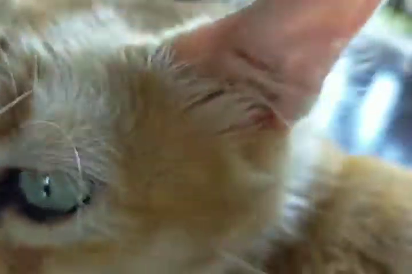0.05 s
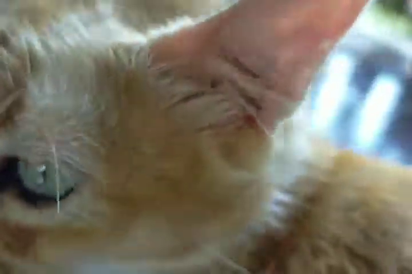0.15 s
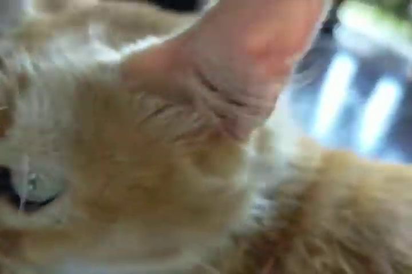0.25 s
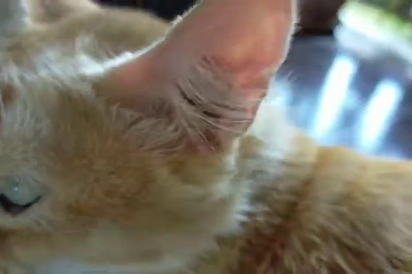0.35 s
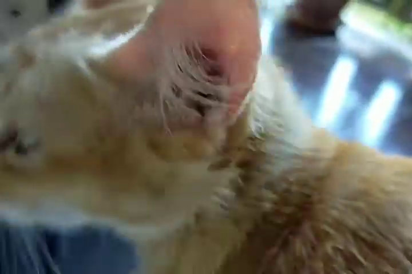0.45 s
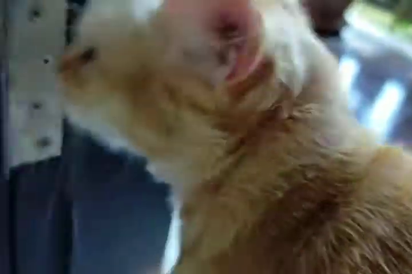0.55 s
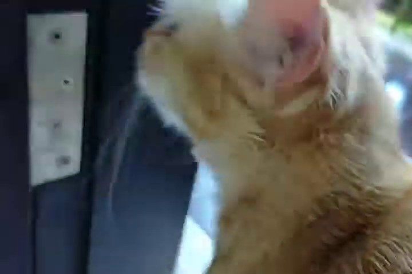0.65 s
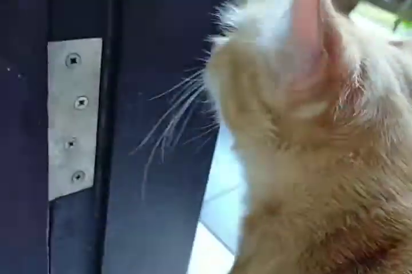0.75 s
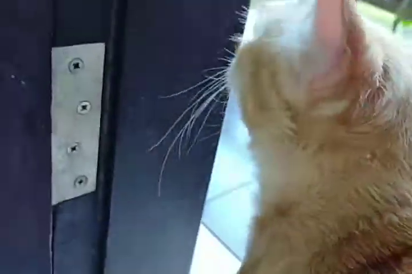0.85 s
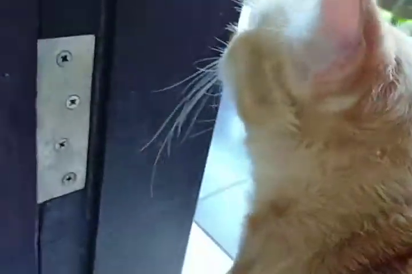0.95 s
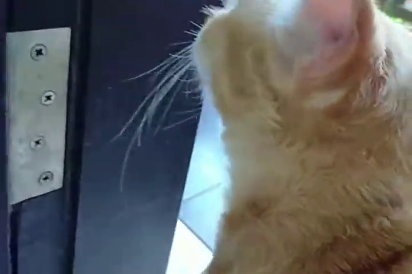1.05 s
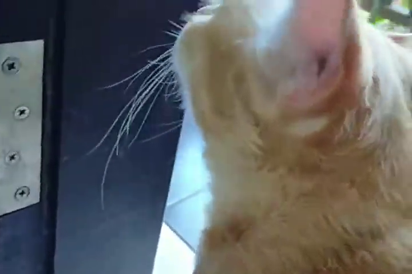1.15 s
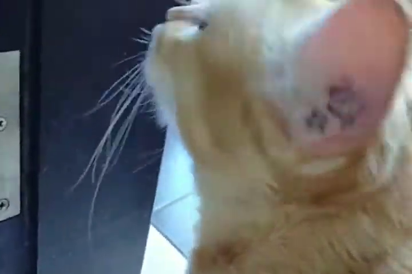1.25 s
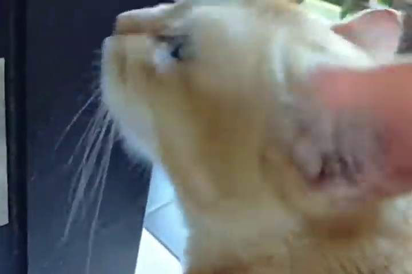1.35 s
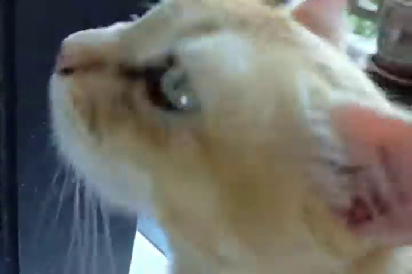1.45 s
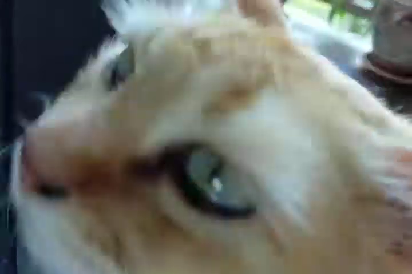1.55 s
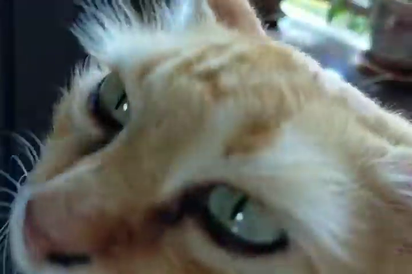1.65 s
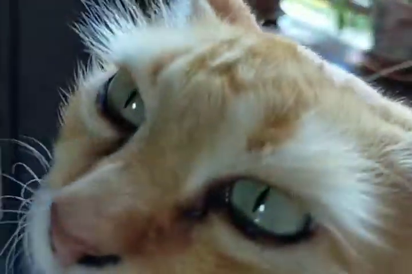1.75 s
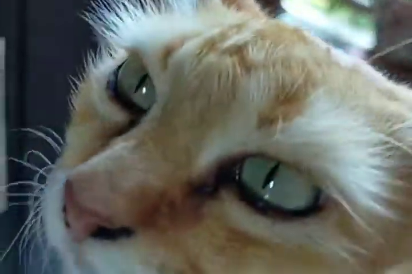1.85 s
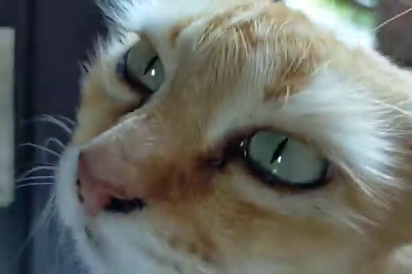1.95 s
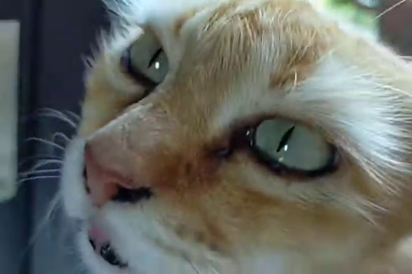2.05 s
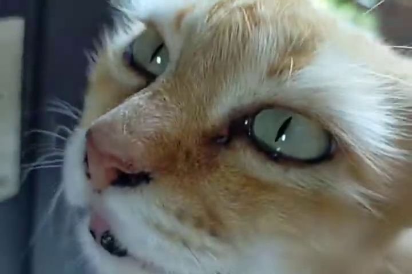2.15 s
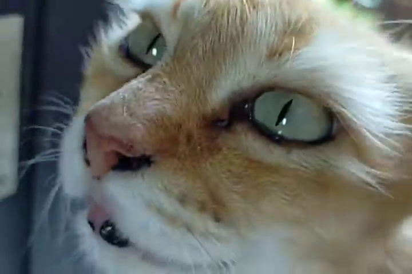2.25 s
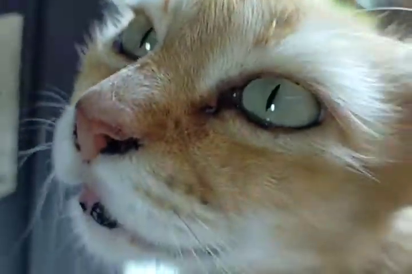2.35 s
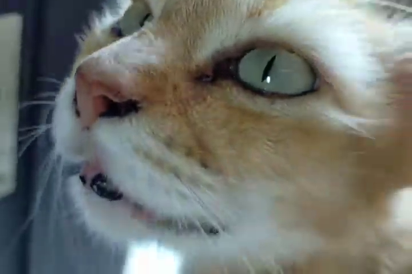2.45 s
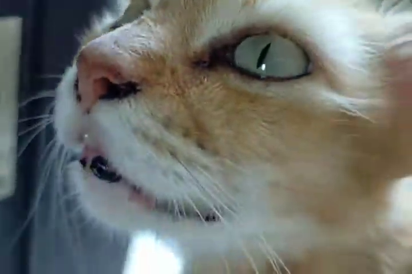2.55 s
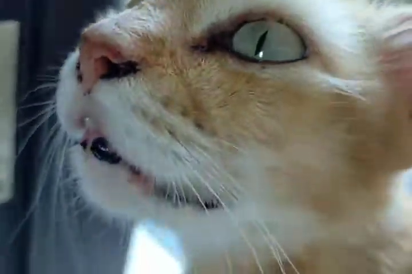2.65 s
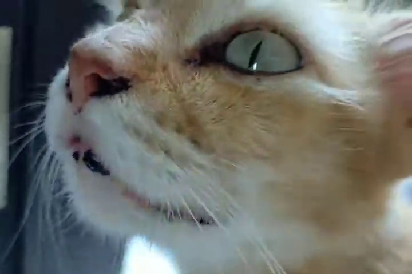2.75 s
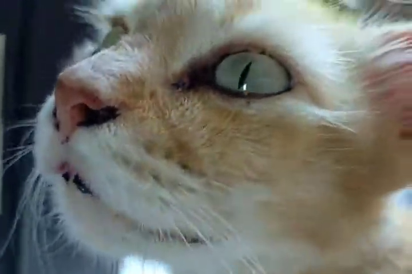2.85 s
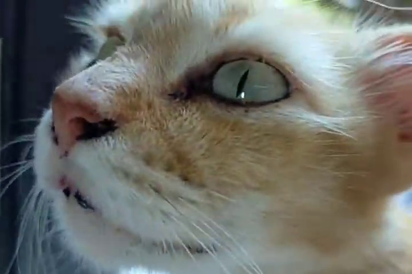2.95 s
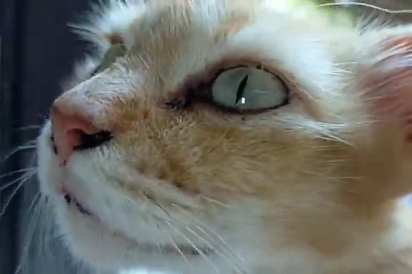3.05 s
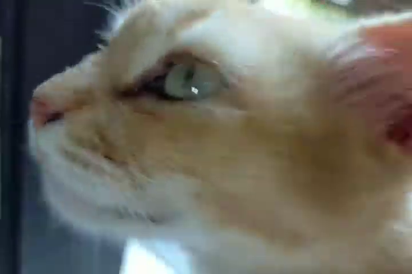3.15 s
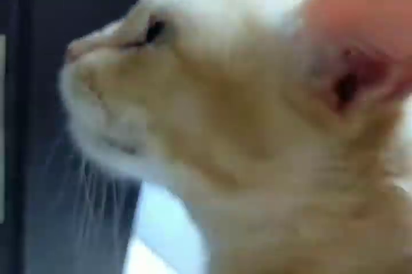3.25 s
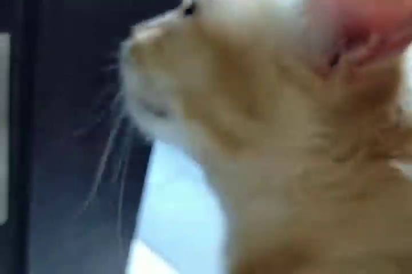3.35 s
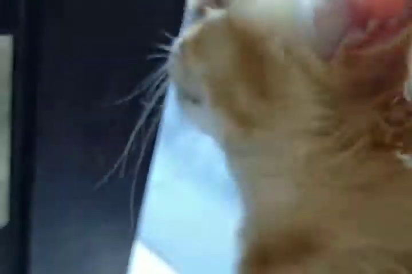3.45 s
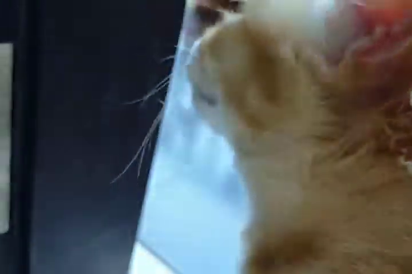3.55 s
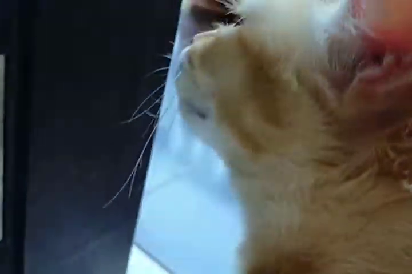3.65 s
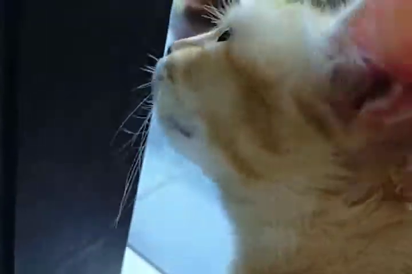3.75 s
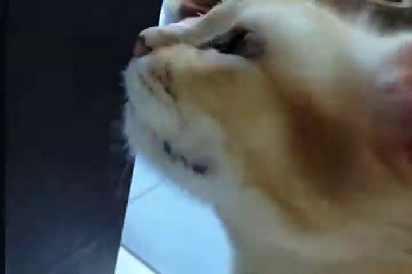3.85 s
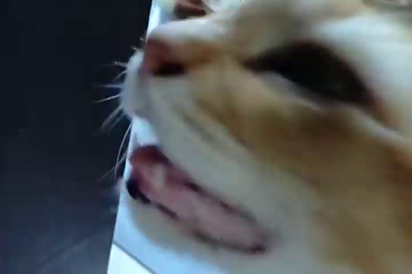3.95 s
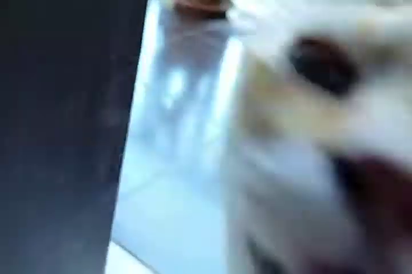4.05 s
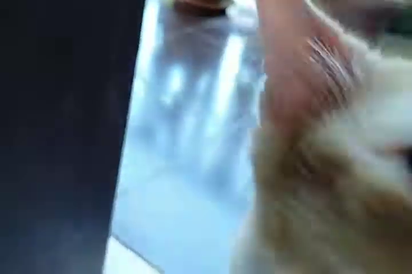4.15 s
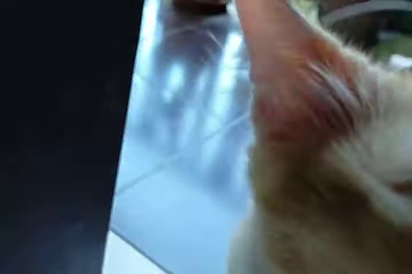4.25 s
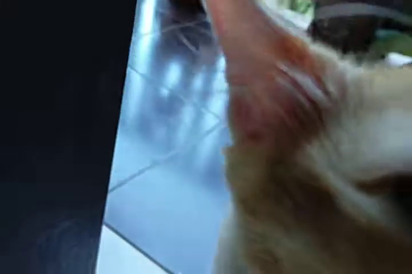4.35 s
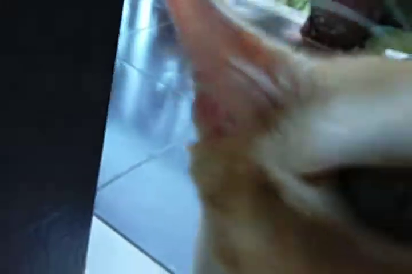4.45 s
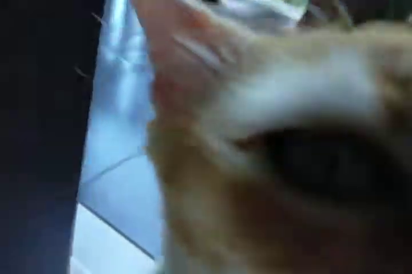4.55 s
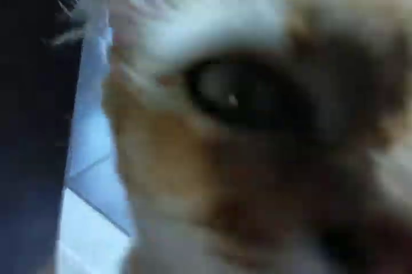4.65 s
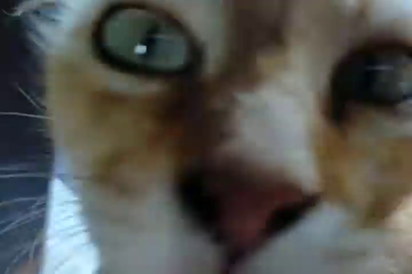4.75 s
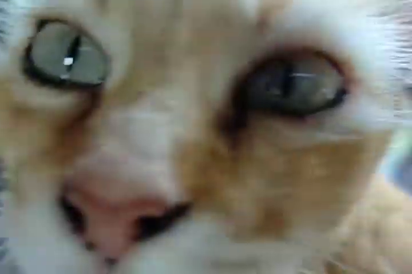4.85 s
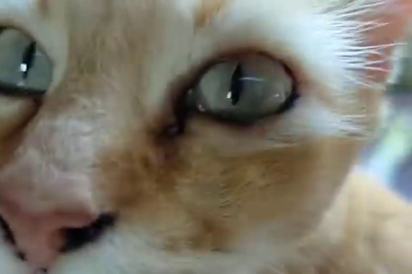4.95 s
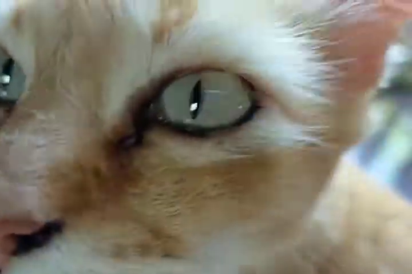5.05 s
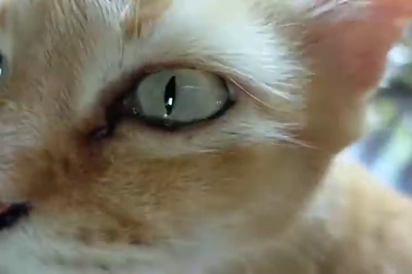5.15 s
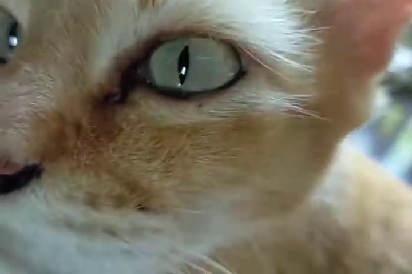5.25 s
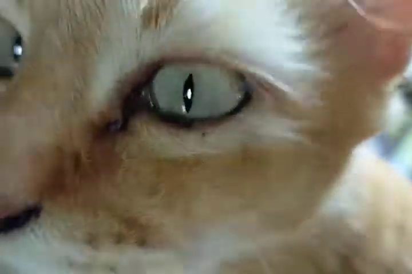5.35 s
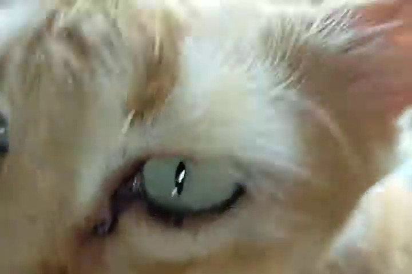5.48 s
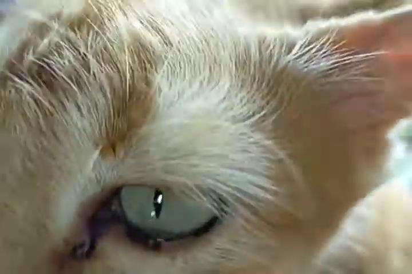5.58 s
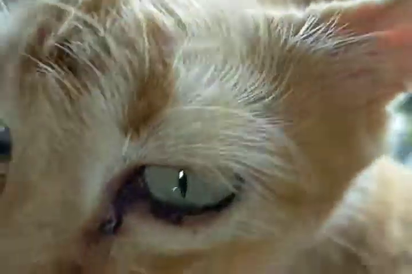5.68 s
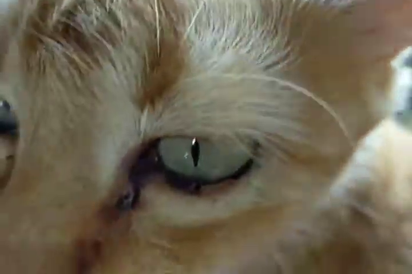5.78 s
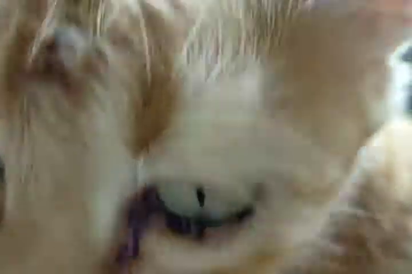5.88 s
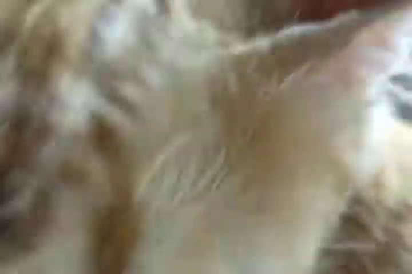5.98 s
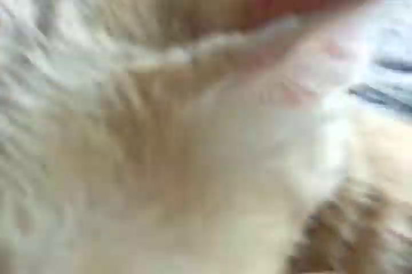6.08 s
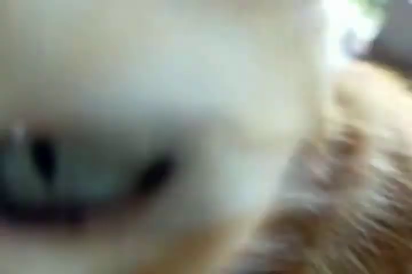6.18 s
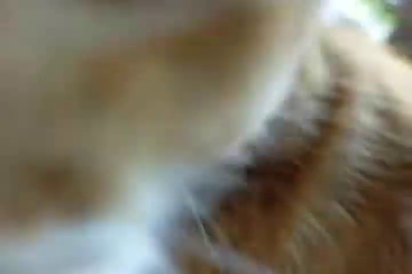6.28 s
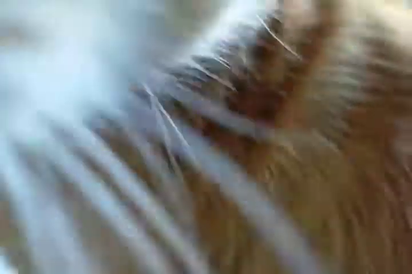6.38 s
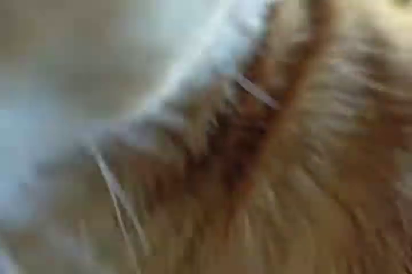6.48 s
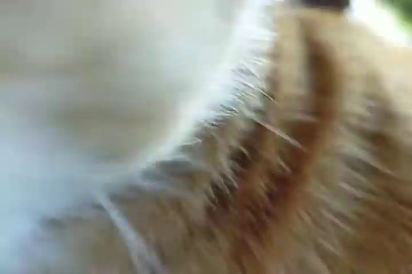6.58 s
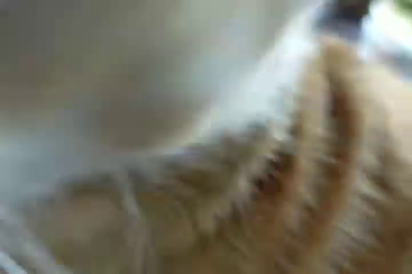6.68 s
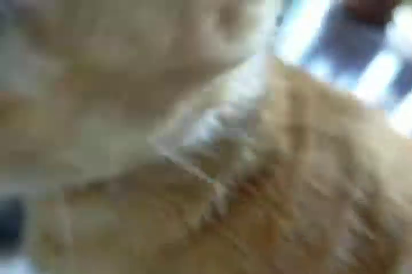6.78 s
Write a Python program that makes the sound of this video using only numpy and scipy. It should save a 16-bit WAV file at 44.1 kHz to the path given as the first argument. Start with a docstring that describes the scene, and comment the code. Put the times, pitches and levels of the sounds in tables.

```python
"""Outdoors, on a hand-held camera's single microphone: air, far insects, distant traffic that later swells.
From the start the hand rumbles, knocks and rustles on the body; low engine notes drift, a far metallic thing squeaks.
Then, right at the microphone, a cat's soft rising murmur opens into a short call; a longer, louder one follows.
Calls are partials shaped by a moving mouth, plus pulsing breath; air, rumble and rustle are coloured noise;
engines and squeak are unsteady tones, knocks are slow pushes."""
import sys
import numpy as np
from scipy import signal
from scipy.fft import rfft, irfft, next_fast_len
from scipy.io import wavfile
from scipy.ndimage import map_coordinates

SR = 44100
rng = np.random.default_rng(int(sys.argv[2]) if len(sys.argv) > 2 else 0)


def wav_out(sig):
    """Save sig, one row per channel (or a flat mono array), as 16-bit PCM at SR to the path in sys.argv[1]."""
    wavfile.write(sys.argv[1], SR, np.round(np.clip(np.atleast_2d(sig).T, -1, 1) * 32767).astype(np.int16))


N = 300569

# colour of the cat's breath, in the calls and in the puffs: (f/Hz, density/dB per Hz)
BREATH_TONE = [(700, -23.5), (1200, -4), (2100, 3.5), (3000, -7), (4700, -14.5), (6500, -22.5),
               (12000, -34)]


def amp(db):
    """Gain of a level in dB."""
    return 10 ** (np.asarray(db) / 20)


def unit(x):
    """x at rms 1."""
    return x / np.sqrt(np.mean(x ** 2) + 1e-20)


def along(points, hz):
    """(f/Hz, value) points read on a log frequency axis."""
    f, v = np.transpose(points)
    return np.interp(np.log(hz + 1), np.log(f + 1), v)


def curves(rows, t):
    """Each column after the time, read at times t."""
    s, *cols = np.transpose(rows)
    return [np.interp(t, s, c) for c in cols]


def wobble(rate, size=N):
    """A smooth random curve, rate knots a second (400 at most)."""
    knots = rng.standard_normal(int(size / SR * 400) + 4)
    return map_coordinates(knots, [np.arange(size) * min(rate, 400) / SR])


def hump(t, s, half):
    """A smooth rise and fall centred on s."""
    return np.cos(np.pi / 2 * np.clip((t - s) / half, -1, 1)) ** 2


def filtered(x, response):
    """x times a response of frequency."""
    m = next_fast_len(len(x) + 8192)
    return irfft(rfft(x, m) * response(np.fft.rfftfreq(m, 1 / SR)), m)[:len(x)]


def noise(spectrum, size=N):
    """Noise of rms 1 coloured by the spectrum, falling to -120 dB an octave beyond either end."""
    closed = [(spectrum[0][0] * .5, -120), *spectrum, (spectrum[-1][0] * 2, -120)]
    return unit(filtered(rng.standard_normal(size), lambda hz: amp(along(closed, hz))))


def bursts(rows, tone, bed_db=-120):
    """Coloured noise that swells and fades at each (t/s, half length/s, level/dB), over a steady bed."""
    t = np.arange(N) / SR
    swells = sum(amp(db) * hump(t, s, half) for s, half, db in rows)
    return (amp(bed_db) + swells) * noise(tone)


def add(out, s, x):
    """Mix x into out from time s."""
    part = out[max(round(s * SR), 0):][:len(x)]
    part += x[:len(part)]


def note(start, end, start_hz, end_hz, waver, flutter_db, rate):
    """Phase and swell of a slightly unsteady tone."""
    u = np.linspace(0, 1, round((end - start) * SR))
    hz = (start_hz + (end_hz - start_hz) * u) * (1 + waver * wobble(rate, size=len(u)))
    swell = np.sin(np.pi * u) ** .5 * amp(flutter_db * wobble(rate, size=len(u)))
    return 2 * np.pi * np.cumsum(hz) / SR, np.sqrt(2) * swell


def outdoors():
    """Steady air, far insects and swelling traffic as coloured noise, engine notes as drifting sines."""
    # the air around the microphone: (f/Hz, density/dB per Hz)
    air_tone = [(35, -40), (60, -5), (139, -6), (188, 0.5), (243, -4.5), (292, -9), (329, -9.5), (455, -10),
                (588, -8.5), (646, -9.5), (874, -10), (1180, -9), (2120, -11.5), (3450, -24.5),
                (15700, -32)]
    # far steady shrilling: (f/Hz, density/dB per Hz)
    insect_tone = [(6800, -9.5), (7600, -5.5), (8300, -1.5), (9000, -6.5), (9800, -22.5)]
    # colour of the distant traffic: (f/Hz, density/dB per Hz)
    road_tone = [(88, -38), (150, -6.5), (187, 0), (282, -9), (485, -14), (522, -7.5), (570, -12),
                 (670, -8), (1260, -3), (2140, -11.5), (5000, -36.5), (6500, -64), (11000, -120)]
    # the traffic's swell: (t/s, level/dB)
    traffic = [(0, -78), (1.86, -80), (2.1, -61), (2.73, -62), (3.57, -57.5), (4.2, -51.5), (6.11, -51.5),
               (6.47, -49), (6.82, -51.5)]
    # faint drifting engine notes: (start t/s, end t/s, start f/Hz, end f/Hz, level/dB)
    drones = [(.6, 0.998, 221.7, 217, -59.5), (.75, 1.104, 272.3, 304, -64.5),
              (.78, 1.714, 560, 600, -67.5), (1.4, 1.656, 299, 310, -61.5), (2.07, 2.31, 218, 218.6, -54),
              (4.1, 4.489, 193.7, 181.8, -58), (4.62, 4.88, 188, 180.3, -53.5),
              (4.95, 5.25, 181.1, 181.3, -59), (5.4, 5.895, 186.5, 173.1, -56.5),
              (6.36, 6.48, 520, 529, -61)]
    air_db, insects_db = -55.5, -73

    road_db = curves(traffic, np.arange(N) / SR)[0]
    out = amp(air_db) * noise(air_tone)
    out += amp(road_db + 0.61 * wobble(11.0)) * noise(road_tone)
    out += amp(insects_db + 1.2 * wobble(1.8)) * noise(insect_tone)
    for start, end, start_hz, end_hz, db in drones:
        phase, swell = note(start, end, start_hz, end_hz, waver=.014, flutter_db=3.5, rate=22)
        add(out, start, amp(db) * swell * np.sin(phase))
    return out


def hand():
    """Soft pushes on the body over a lumpy two-band rumble, and a fine rustle of fur and fingers over hiss."""
    # how hard the hand works the body: (t/s, low rumble level/dB)
    grip = [(0, -51.5), (.45, -46), (.83, -59.5), (1.18, -39), (1.5, -61), (2.4, -60.5), (3.1, -68),
            (3.7, -59.5), (4.35, -46), (4.48, -53), (4.7, -49.5), (5.1, -57.5), (5.54, -53), (5.66, -48),
            (5.85, -53.5), (6.23, -49), (6.41, -57), (6.6, -48.5), (6.82, -39)]
    # knocks on the body: (t/s, peak level/dB, push length/s, direction)
    bumps = [(.301, -37, 0.0031, 1), (.353, -32, .012, 1), (.361, -28.5, 0.0024, 1), (.387, -24, 0.006, 1),
             (.432, -36, 0.0036, 1), (.806, -36.5, 0.011, -1), (.887, -36.5, 0.0078, 1),
             (1.171, -32.5, 0.0034, 1), (1.18, -31.5, 0.0077, -1), (1.212, -29, 0.0047, 1),
             (1.363, -36.5, 0.0092, 1), (3.902, -33.5, 0.0076, 1), (5.645, -31, 0.0029, 1),
             (5.711, -41, 0.0051, 1), (5.757, -35, 0.0042, 1), (6.02, -38, 0.013, 1),
             (6.394, -37, 0.0085, 1), (6.682, -28, .003, 1), (6.689, -35, 0.0079, 1)]
    # fur and fingers: (t/s, half length/s, level/dB)
    rustles = [(.6, 0.58, -70), (.63, .04, -69), (.72, .04, -67), (.82, .07, -66), (1.35, .3, -67),
               (1.1, .05, -64), (1.31, 0.064, -63), (1.43, .04, -64.5), (1.53, .04, -61), (1.75, .04, -67),
               (1.99, .07, -70), (2.23, .05, -64), (2.5, .06, -75), (2.72, .06, -73), (2.96, .06, -68.5),
               (3.16, .04, -69), (3.29, .06, -73), (3.57, .07, -68), (3.83, .05, -68), (5.48, .06, -75),
               (6.05, .1, -81), (6.35, .08, -67), (6.5, .1, -65), (6.74, .07, -71)]
    # colour of the rustle and the hiss: (f/Hz, density/dB per Hz)
    rustle_tone = [(5000, -40.5), (7500, -19), (11000, -17), (13500, -9), (15700, -3.5)]
    upper_rumble_db, upper_follows = -57, .4  # level at a grip of -52 dB; share of the grip's swing
    hiss_bed_db = -74.5  # steady high hiss throughout

    t = np.arange(N) / SR
    out = np.zeros(N)
    for s, db, length, direction in bumps:
        u = np.arange(round(-2 * length * SR), round(6 * length * SR)) / SR / length
        # a quick push, then a slower and weaker swing back
        push = np.exp(-2.8 * u ** 2) - 0.84 * np.exp(-((u - 1.5) / 0.71) ** 2)
        add(out, s - 2 * length, np.sign(direction) * amp(db) * push)
    low_db, = curves(grip, t)
    upper_db = upper_rumble_db + upper_follows * (low_db + 52)
    out += amp(low_db + 3.6 * wobble(11)) * noise([(18, -2.0), (30, -4), (70, -12.5)])
    out += amp(upper_db + 3.4 * wobble(36)) * noise([(70, -2.0), (110, -4.0), (160, -17)])
    return out + amp(2.5 * wobble(45)) * bursts(rustles, rustle_tone, hiss_bed_db)


def squeak():
    """Far metal: a steady tone with overtones; a scratchy band just above it starts a little earlier."""
    # each squeak: (start t/s, end t/s, tone level/dB, overtone level re tone/dB, scratch level/dB);
    # the overtone level is reached two thirds of the way through
    squeaks = [(1.199, 1.386, -57, -18, -65), (1.342, 1.463, -68, -8, -69), (3.009, 3.257, -70, -18, -75),
               (5.395, 5.548, -62, -10, -58.5), (5.522, 5.64, -66, -20, -69)]
    # colour of the scratch: (f/Hz, density/dB per Hz)
    scratch_tone = [(3300, -18), (3520, 3), (3620, -12), (3780, 5), (3950, -35)]
    squeak_hz = 3073

    out = np.zeros(N)
    for start, end, db, overtone_db, scratch_db in squeaks:
        phase, swell = note(start, end, squeak_hz, squeak_hz, waver=.0015, flutter_db=2.5, rate=50)
        late = np.linspace(0, 1.5, len(phase))  # the overtones grow toward the end
        overtones = np.sin(2 * phase) + np.sin(4 * phase)
        tone = np.sin(phase) + amp(overtone_db) * late * overtones
        add(out, start, amp(db) * swell * np.hanning(len(phase)) ** .6 * tone)
        size = len(phase) + round(.04 * SR)
        scratch = np.hanning(size) ** .7 * noise(scratch_tone, size=size)
        add(out, start - .07, amp(scratch_db) * scratch)
    return out


def meow(rows, jitter, tremor, mouth_width_hz=500):
    """A clear stack of partials shaped by the moving mouth, with breath pulsing once a cycle."""
    # through both calls: (t/s, mouth ring level/dB, treble level/dB)
    mouth_rows = [(1.83, -88, -85), (2.155, -78, -78), (2.18, -53, -76), (2.21, -60, -74), (2.25, -47, -65),
                  (2.45, -52, -68), (2.496, -51, -58), (2.56, -57, -69), (2.612, -66, -63.5),
                  (2.7, -57, -73), (2.78, -79, -78), (3.9, -92, -86), (3.94, -60.5, -68),
                  (3.965, -42.5, -65), (4.0, -49, -56), (4.088, -50, -61), (4.128, -58, -55),
                  (4.2, -51.5, -48), (4.314, -51, -48.5), (4.434, -46, -54.5), (4.55, -51.5, -56.5),
                  (4.64, -48, -49), (4.76, -54, -49), (4.8, -50, -53), (4.91, -61, -56.5), (5.01, -72, -73),
                  (5.08, -57, -79), (5.112, -64, -74)]
    # partials five to ten, re treble level: (f/Hz, level/dB)
    treble_shape = [(3530, -23.5), (6000, -22.5), (7460, -4), (8150, -12), (9500, -18.5), (12400, -43),
                    (20900, -120)]
    # partials above the tenth, re treble level less 11 dB: (f/Hz, level/dB)
    top_shape = [(9000, -7), (10300, -6.5), (11200, -13.5), (12000, -14), (13000, -8), (14000, -19),
                 (15300, -10)]
    # the voice turns unsteady where it is weak: (t/s, half length/s, extra jitter as a multiple)
    rough = [(2.06, .13, 7), (2.81, .08, 5), (3.83, .09, 6), (5.06, .09, 1.6)]
    # the voice slips: (t/s, pitch drop as a share, level drop/dB)
    slips = [(2.827, 0.015, 29), (4.116, 0.019, 3), (4.207, 0.0088, -1), (4.38, 0.028, 3.5),
             (4.427, .014, 4), (4.68, 0.015, 4), (4.786, 0.035, 8.5), (4.821, 0.016, 0),
             (4.851, 0.035, 3.5), (5.059, 0.011, 10)]
    # every second cycle weaker, lines appear halfway between partials: (t/s, half length/s, level/dB)
    doubling = [(2.11, 0.05, -48), (3.976, .025, -44.5), (4.089, 0.02, -43), (4.126, 0.012, -40)]
    # the call quavers out: (onset t/s, first crest t/s, rate f/Hz, pitch depth as a share)
    quaver_settings = (2.696, 2.714, 31.2, .036)
    bright_db = -45  # partial 4 with the mouth wide open
    open_mouth_hz, mouth_hz_per_db = 5376, 34  # the ring when wide open, and its fall as the voice dulls
    # breath when wide open; share of the dulling it follows; rise per unit of extra jitter
    open_breath_db, breath_follows, hoarse_db = -57.5, .45, 1.6
    slip_s = .0075  # half length

    t = np.arange(round(rows[0][0] * SR), round(rows[-1][0] * SR)) / SR
    pitch, *low_db = curves(rows, t)
    mouth_db, treble_db = curves(mouth_rows, t)
    brightness_db = low_db[3] - bright_db  # negative as the voice dulls
    mouth_hz = open_mouth_hz + mouth_hz_per_db * np.clip(brightness_db, -22, 0)

    unsteady = sum(extra * hump(t, s, half) for s, half, extra in rough)
    flutter = wobble(110, size=len(t)) * (1 + unsteady)
    onset, crest, rate, depth = quaver_settings
    fade_in = np.clip((t - onset) * rate / 0.99, 0, 1)
    quaver = tremor * fade_in * np.cos(2 * np.pi * rate * (t - crest))
    drop = sum(share * hump(t, s, slip_s) for s, share, _ in slips)
    weaker_db = sum(db * hump(t, s, slip_s) for s, _, db in slips)
    pitch = pitch * (1 + jitter * flutter + depth * quaver - drop)
    phase = 2 * np.pi * np.cumsum(pitch) / SR

    voice = np.zeros(len(t))
    for k in range(1, 18):
        hz = k * pitch
        if k <= len(low_db):
            gain = amp(low_db[k - 1])
        else:
            mouth = amp(mouth_db) / (1 + (2 * (hz - mouth_hz) / mouth_width_hz) ** 2)
            open_hz = hz * open_mouth_hz / mouth_hz  # all upper resonances sink with the ring
            shape_db = along(treble_shape, open_hz) if k <= 10 else -11 + along(top_shape, open_hz)
            gain = mouth + amp(treble_db + shape_db)
        # the resonances over the fundamental turn pitch flutter and slips into throbs
        throb_db = .7 * flutter + .45 * wobble(75, size=len(t)) * min(k, 7) + 1.5 * quaver - weaker_db
        if k > 6:  # tongue and lips shift the high partials one by one
            throb_db += 2.5 * wobble(9, size=len(t))
        if k == 1:
            throb_db *= .4
        partial = np.sin(k * phase + rng.uniform(0, 2 * np.pi))
        voice += np.sqrt(2) * gain * amp(throb_db) * partial

    halves = sum(amp(db) * hump(t, s, half) for s, half, db in doubling)
    voice += halves * (np.sin(2.5 * phase) + .2 * np.sin(3.5 * phase))
    breath_db = open_breath_db + breath_follows * brightness_db + hoarse_db * unsteady
    breath = amp(breath_db) * noise(BREATH_TONE, size=len(t)) * (1 + .5 * np.cos(phase))
    return (voice + breath) * signal.windows.tukey(len(t), .015)


def cat():
    """Both calls, throat catches as short sines, puffs of air as crackly noise, rasps as smooth bright noise."""
    # each call: (t/s, pitch f/Hz, partial 1 level/dB, partial 2 level/dB, partial 3 level/dB, partial 4 level/dB)
    first_call = [(1.83, 400, -67, -70, -63, -84), (1.939, 498, -63, -62, -72, -84),
                  (2.0, 547.4, -60, -60, -66, -84), (2.039, 639, -56, -58, -59, -85),
                  (2.123, 678, -70, -43, -47.5, -73), (2.15, 806, -59, -46.5, -64, -80),
                  (2.18, 948, -38, -40, -49, -70), (2.21, 1041, -39.5, -44.5, -53, -60),
                  (2.245, 967, -36, -39.5, -43, -62), (2.275, 955.4, -36.5, -38, -53.5, -64),
                  (2.446, 983, -36.5, -42, -44.5, -62), (2.495, 922.5, -37, -35, -47, -58),
                  (2.552, 975, -37, -38.5, -52, -63), (2.612, 998, -39, -43.5, -49, -65),
                  (2.72, 963, -38, -41.5, -50, -66), (2.8, 930, -40.5, -48, -54, -68),
                  (2.85, 850, -48, -58, -55, -76)]
    # columns as in the first call
    second_call = [(3.76, 516, -62, -63, -75, -85), (3.86, 570, -61, -65, -68, -83),
                   (3.895, 880, -55, -68, -67, -83), (3.922, 906, -36, -57, -58, -80),
                   (3.944, 914, -34, -34.5, -47.5, -75), (3.975, 896.7, -34.5, -32, -38, -50.5),
                   (4.015, 925, -36.5, -29, -39, -45), (4.095, 918, -38.5, -25, -41.5, -42),
                   (4.128, 874, -34, -29, -37.5, -42), (4.191, 890, -32.5, -27.5, -35.5, -41),
                   (4.313, 904, -32, -20.5, -41, -45), (4.433, 915.5, -32.5, -17.5, -46, -49.5),
                   (4.529, 922, -32.5, -18.5, -46.5, -49), (4.66, 941, -31.5, -16, -43.5, -48.5),
                   (4.695, 932.6, -32, -21, -42, -46.5), (4.77, 927.6, -34, -24.5, -46, -43.5),
                   (4.805, 954, -33, -21, -49, -48.5), (4.908, 996.6, -34, -27, -44, -52.5),
                   (5.004, 978, -36, -37.5, -50.5, -57.5), (5.03, 962, -38.5, -42.5, -52, -65),
                   (5.08, 983, -36.5, -40.5, -52, -62), (5.097, 875, -40, -48, -50, -53),
                   (5.112, 1100, -38, -62, -72, -76)]
    # catches of the voice: (centre t/s, length/s, ringing f/Hz, peak level/dB)
    catches = [(2.057, 0.014, 1520, -51), (2.142, .03, 1246, -43), (2.739, 0.011, 1187, -43),
               (2.859, 0.021, 750, -45), (2.907, 0.026, 2250, -52), (3.16, .027, 2200, -53),
               (3.941, .012, 1885, -22.5), (4.253, 0.0088, 1895, -20), (5.109, 0.0083, 1184, -32),
               (5.122, .013, 1690, -43), (5.127, .008, 1050, -37), (5.147, 0.0091, 1513, -47),
               (5.16, .04, 3650, -54)]
    # breath let out: (t/s, half length/s, level/dB)
    puffs = [(2.15, 0.028, -57), (2.877, 0.16, -59), (3.173, 0.031, -55), (5.105, 0.015, -60),
             (5.135, 0.072, -48)]
    # bright air through the teeth: (t/s, level/dB)
    rasps = [(3.96, -59), (4.085, -53), (4.12, -59), (4.2, -55), (4.255, -63), (4.305, -59), (4.66, -57),
             (4.79, -58)]
    # colour of the rasps: (f/Hz, density/dB per Hz)
    rasp_tone = [(2000, -15), (4000, -6), (7500, -3), (10000, -8), (13000, -19.5), (15700, -10)]
    rasp_s = 0.019  # half length

    out = np.zeros(N)
    add(out, first_call[0][0], meow(first_call, jitter=.004, tremor=1))
    add(out, second_call[0][0], meow(second_call, jitter=.005, tremor=0))
    for s, length, hz, db in catches:
        t = np.arange(round(length * SR)) / SR
        add(out, s - length / 2, amp(db) * np.hanning(len(t)) * np.sin(2 * np.pi * hz * t))
    crackle = amp(2.5 * wobble(300))
    rasp_rows = [(s, rasp_s, db) for s, db in rasps]
    return out + crackle * bursts(puffs, BREATH_TONE) + bursts(rasp_rows, rasp_tone)


def porch(x):
    """A faint diffuse answer of tiles and walls: a noise tail falling 60 dB in 0.3 s."""
    t = np.arange(SR // 2) / SR
    tail = rng.standard_normal(len(t)) * amp(-60 * t / .3)
    return amp(-23) * signal.fftconvolve(x, tail / np.linalg.norm(tail))[:N]


def scene():
    """Everything at the single microphone; only the cat's voice is answered by the porch."""
    voice = cat()
    return (voice + porch(voice) + hand() + outdoors() + squeak())[None]


def record(dry):
    """The camera keeps nothing above its band limit."""
    top_hz = 15720
    return filtered(dry[0], lambda hz: hz < top_hz)[None]


dry = scene()
out = record(dry)
wav_out(out)
```